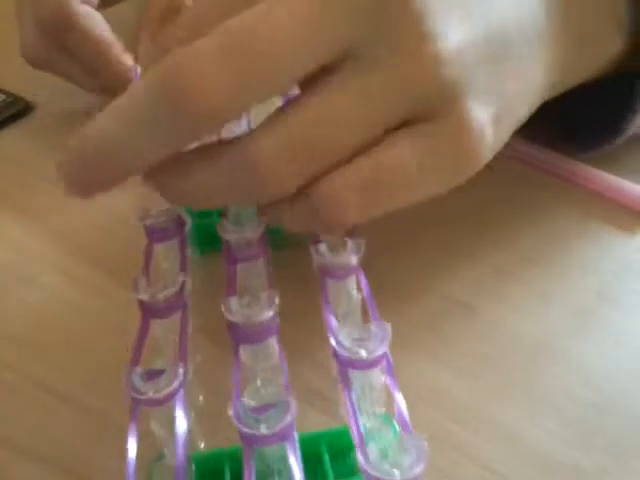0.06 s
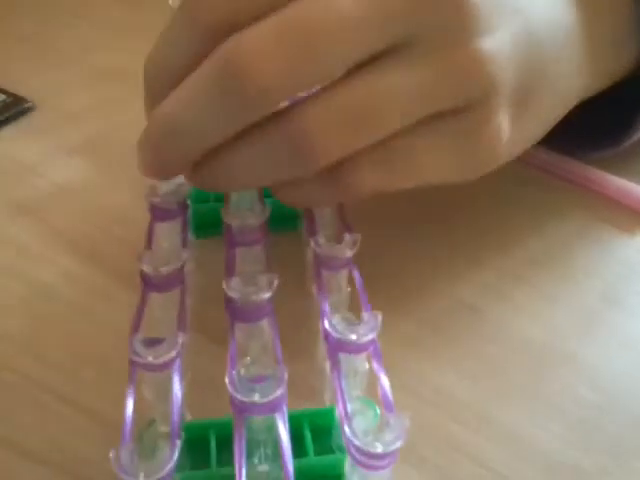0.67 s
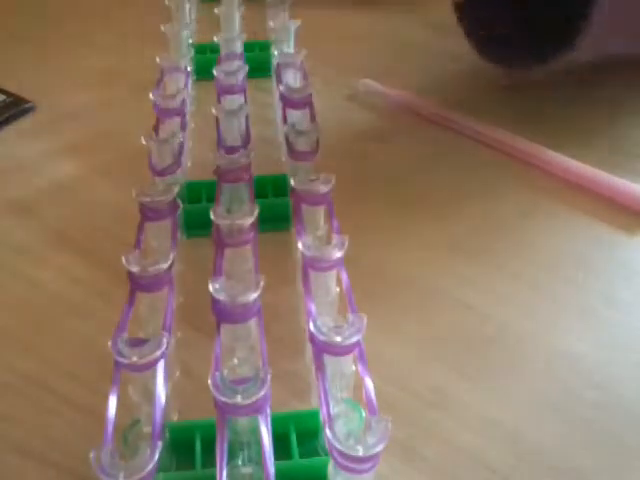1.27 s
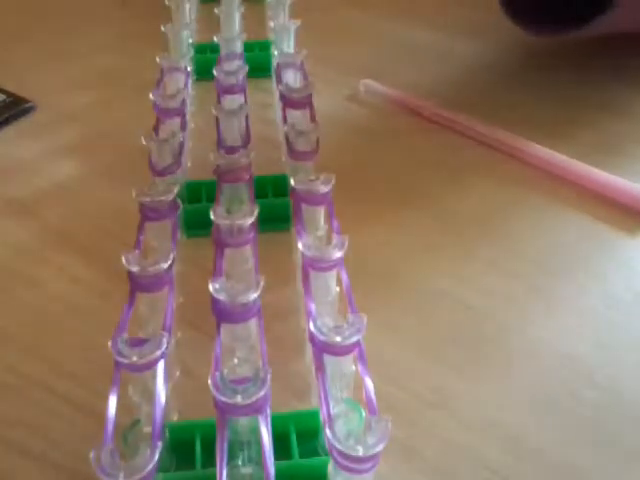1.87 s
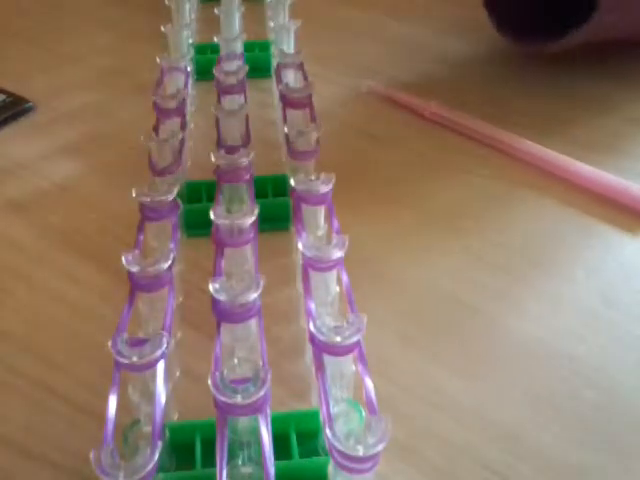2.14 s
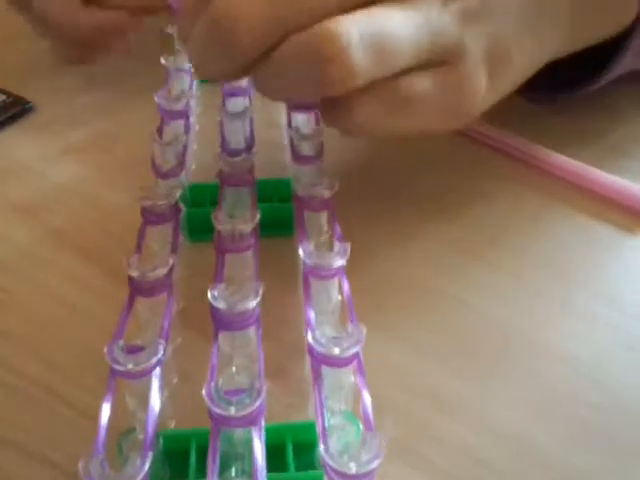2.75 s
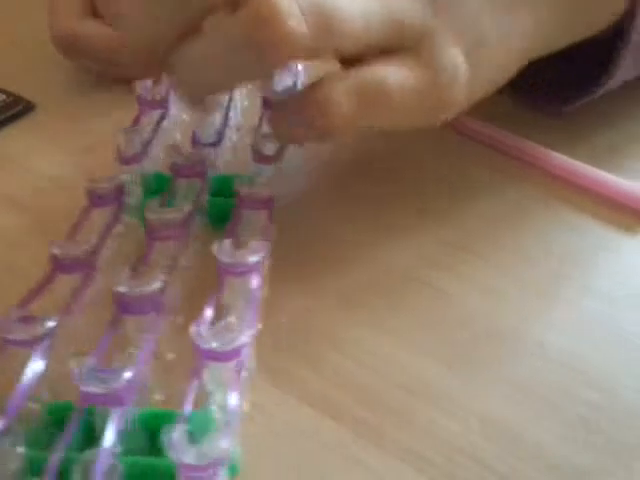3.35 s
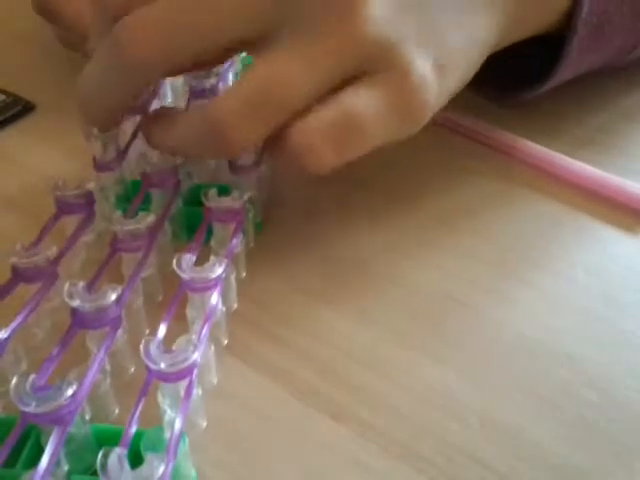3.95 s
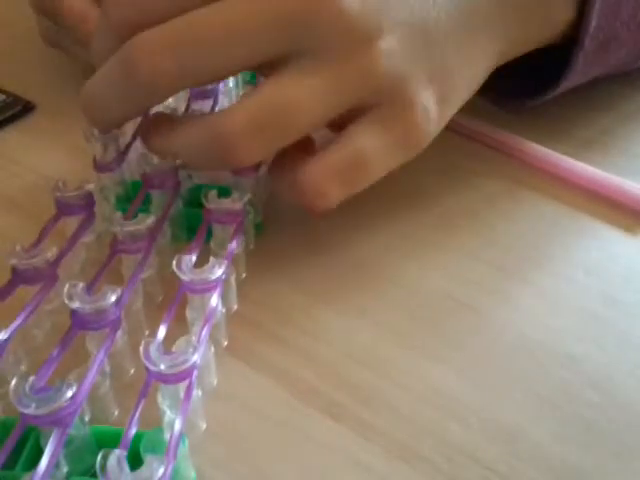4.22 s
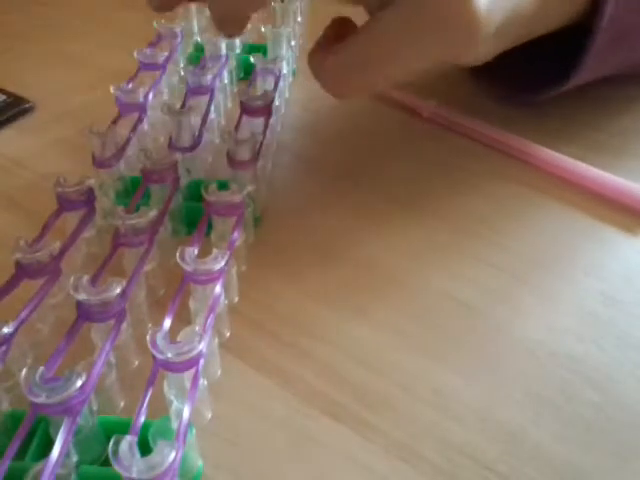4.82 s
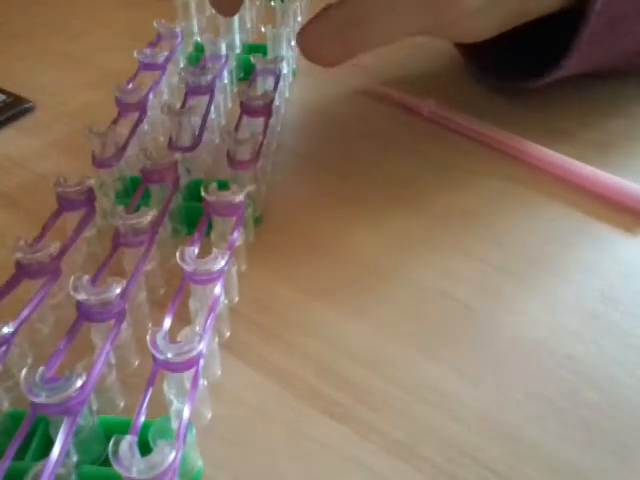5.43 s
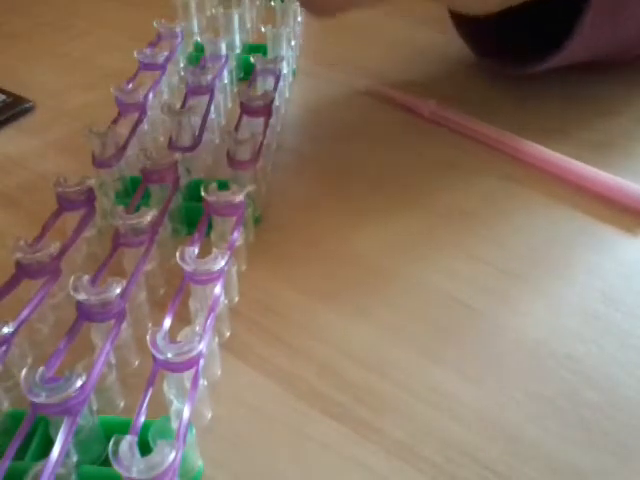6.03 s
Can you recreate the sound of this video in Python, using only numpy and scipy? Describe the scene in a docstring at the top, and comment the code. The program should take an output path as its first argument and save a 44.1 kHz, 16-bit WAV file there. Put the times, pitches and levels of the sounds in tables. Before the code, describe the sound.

Fingers work rubber bands over plastic loom pegs in a quiet room, making scattered clicks, light taps and soft scrapes.

```python
"""In a small, quiet room, rubber bands are hooked over the pegs of a plastic loom on a wooden table.
Impacts excite resonant modes: the pegs click, the frame clacks down and the table thumps, heard in
nearly opposite phase by two close microphones. Stick-slip friction makes the loom scrape as it is
pushed, the plastic rasp under the fingers and the table rumble under the arms. A thin hiss comes and
goes, and a short reverberation follows the loom's sounds over a faint background noise."""
import sys
import numpy as np
from scipy import signal
from scipy.fft import rfft, irfft
from scipy.io import wavfile
from scipy.ndimage import uniform_filter1d

SR = 44100
rng = np.random.default_rng(int(sys.argv[2]) if len(sys.argv) > 2 else 0)


def file_out(sig):
    """Save sig as 16-bit WAV at sys.argv[1]."""
    # one column per channel
    cols = np.atleast_2d(sig).T
    # limit, then scale
    lim = np.clip(cols, -1, 1)
    pcm = np.round(lim * 32767).astype(np.int16)
    wavfile.write(sys.argv[1], SR, pcm)


N = 273420
TIME = np.arange(N) / SR
HIT_SAMPLES = 2048
SIDES = np.array([[1], [-1]])   # left, right


def from_db(db):
    return 10 ** (np.asarray(db) / 20)


def unit_rms(x):
    return x / np.sqrt(np.mean(x ** 2) + 1e-20)


def at_hz(points, hz, column=1):
    """Interpolation of a table column on a log-frequency axis."""
    points = np.array(points)
    return np.interp(np.log(np.maximum(hz, 1)), np.log(points[:, 0]), points[:, column])


def add(out, start_s, sound):
    """Superposition: a sound sums into the mix from start_s on."""
    start = max(round(start_s * SR), 0)
    out[:, start:start + sound.shape[-1]] += sound[:, :N - start]


def band(x, low_hz, high_hz):
    """Band-pass filtering keeps one range of frequencies."""
    edges_hz = [low_hz, min(high_hz, .45 * SR)]
    return signal.sosfilt(signal.butter(2, edges_hz, "band", fs=SR, output="sos"), x)


def swell(start_s, length_s, attack_s, release_s):
    """An envelope: linear rise, hold, then exponential decay."""
    decay = np.exp(-np.maximum(TIME - start_s - length_s, 0) / release_s)
    return np.clip((TIME - start_s) / attack_s, 0, 1) * decay


def stereo(two, correlation):
    """Sum and difference of two independent signals set the left-right correlation."""
    return np.sqrt((1 + correlation) / 2) * two[0] + np.sqrt((1 - correlation) / 2) * two[1] * SIDES


def resonate(x, hz, width_hz):
    """A damped oscillator with unit gain at resonance."""
    r = np.exp(-np.pi * width_hz / SR)
    feedback = [1, -2 * r * np.cos(2 * np.pi * hz / SR), r * r]
    return signal.lfilter(np.array([1, 0, -1]) * (1 - r * r) / 2, feedback, x + 1e-18)


def body(force, modes):
    """Modal superposition: one force drives parallel resonances of alternating sign."""
    return sum((-1) ** k * from_db(db) * resonate(force, hz, width_hz)
               for k, (hz, width_hz, db) in enumerate(modes))


def friction(slips_per_s, spread_db, correlation, size=N):
    """Stick-slip friction: a dense random train of uneven impulses."""
    slips = (rng.random((2, size)) < slips_per_s / SR) * rng.choice([-1, 1], (2, size))
    strength = from_db(spread_db * np.minimum(rng.exponential(1, (2, size)), 4))
    return stereo(slips * strength, correlation)


# Spectrum of the background noise: frequency_hz, relative_density_db
AIR_SPECTRUM = [(15, -40), (25, -13), (60, -1), (118, -6.5), (243, -15.5), (318, -16), (515, -17.5),
                (749, -21.5), (811, -20.5), (1500, -24.5), (1760, -26.5), (5880, -28), (7280, -27),
                (13800, -30.5), (15000, -44.5)]

def still_air(level_db=-63, pan_db=1, dip_db=-10.5):
    """Broadband noise: room rumble and microphone hiss. The deepest rumble dips for a while."""
    hz = np.minimum(np.arange(N // 2 + 1) * SR / N, 13500)   # the hiss stays flat at the top
    white = stereo(rng.standard_normal((2, N)), 0.057)
    noise = unit_rms(irfft(rfft(white) * from_db(at_hz(AIR_SPECTRUM, hz)), N))
    deep = signal.sosfiltfilt(signal.butter(2, 90, fs=SR, output="sos"), noise)
    dip = from_db(dip_db * swell(start_s=2.65, length_s=1.0, attack_s=.12, release_s=0.203))
    return from_db(level_db + pan_db / 2 * SIDES) * (noise + (dip - 1) * deep)


# Low modes of the table top, damped by the hands: pitch_hz, width_hz, gain_db
RUMBLE_MODES = [(98.9, 29.5, -2), (153, 60, 0), (236.4, 130, -3), (403.4, 87, -11)]

def table_rumble(drag, resting_db=-78):
    """Forced vibration: skin and sleeves drag on the table, faintly even while the forearms rest."""
    rumble = body(friction(1500, spread_db=5.0, correlation=-0.77), RUMBLE_MODES)
    return (drag + from_db(resting_db)) * unit_rms(band(rumble, 85, 990))


def strike(modes, chatter_s, correlation, vary_db, detune, centre_hz=None, focus_db=0):
    """Impact excitation: a decaying volley of tiny slips rings each mode."""
    t, out = np.arange(HIT_SAMPLES) / SR, 0
    for hz, width_hz, db, pan_db in modes:
        force = stereo(rng.standard_normal((2, HIT_SAMPLES)), correlation) * np.exp(-t / chatter_s)
        hz = hz * np.exp(detune * rng.uniform(-1, 1))   # grip and band tension shift the modes
        if centre_hz:   # the spot that is touched favours the modes near one pitch
            db = db - focus_db * np.log2(hz / centre_hz) ** 2
        ring = resonate(force, hz, width_hz)
        for _ in range(2):   # steep skirts keep the valleys between modes dark
            ring = resonate(ring, hz, 0.83 * hz)
        ring = np.array([unit_rms(channel) for channel in ring])
        out = out + from_db(db + pan_db / 2 * SIDES + vary_db * rng.standard_normal((2, 1))) * ring
    return unit_rms(out) * np.sqrt(.01 * SR / HIT_SAMPLES)   # the energy of 10 ms at unit rms


# Modes of the struck parts: pitch_hz, base_width_hz, gain_db, pan_db (left minus right)
TABLE_MODES = [(137, 70, -18, 0), (245, 140, -2, 2), (400, 130, 2.5, -1), (496, 83, -6.5, 10),
               (657, 610, -7, -6)]
FRAME_MODES = [(910, 91, -4.5, -2), (1048, 184, -3.5, -7.5), (1386, 250, -4.5, -2.5), (1808, 193, -4, -2.5)]
PEG_MODES = [(2500, 940, 5, 4.5), (3690, 300, 3, -2.5), (4133, 330, -5, -21.5), (5420, 180, -1, -3.5)]
TIP_MODES = [(4560, 1500, -2.5, -8), (5690, 210, -4.5, -6.5), (6190, 450, 2, 0), (6914, 210, -0.5, 2),
             (7560, 270, -0.5, 5), (7920, 870, -11.5, 4.5)]
SNAP_MODES = [(11400, 1000, -5, 9.5), (12480, 410, -4.5, 0.5), (13500, 800, -2, 3.5)]
# Touches on the loom: start_s, level_db, weight_db, snap_db, tip_pitch_hz, chatter_s
# Weight (the table's thump) and snap are relative to the level.
TOUCHES = [ (0.0862, -45, -18.5, -8, 7100, .001), (0.194, -63, 5.5, -5, 7000, .005),
           (0.235, -44, -5.5, -12, 7090, 0.0024), (0.242, -51, 9, -16, 6000, .004),
           (0.2512, -34.5, -14, -6, 5860, 0.0003), (0.2542, -31.5, -7.5, -1, 6650, 0.0011),
           (0.262, -39.5, -12, -4.5, 5480, 0.0027), (0.2658, -26, -13, -22, 4940, 0.0021),
           (0.27, -26.5, -5, -19.5, 5520, .0017), (0.2767, -32, -3, -23.5, 6680, 0.0012),
           (0.2863, -36, -5, -15, 4777, 0.0022), (0.793, -66, 5.5, -3, 7240, 0.0052),
           (1.202, -50, -28, -7.5, 6060, 0.00034), (1.258, -58.5, -19, -15, 5800, .0005),
           (2.3077, -50.5, -25, -9.5, 5500, 0.00024), (2.818, -43, 4.5, -36, 5740, 0.0013),
           (2.8482, -48, -1.5, -28, 5600, 0.0036), (2.8931, -49.5, -5.5, -8, 6100, .0027),
           (2.955, -59.5, 4, -11, 5900, 0.005), (3.2219, -47.5, 2, -30, 5800, 0.0033),
           (3.4397, -54.5, 0, -24, 6150, 0.00096), (3.7315, -54, -2, -21, 6270, 0.0039),
           (3.744, -51, 6, -24, 5900, 0.0029), (3.9478, -34, -16.5, -15.5, 6300, 0.0043),
           (3.9546, -27, -17.5, -16, 7000, 0.001), (4.193, -46, -15, -13, 6200, 0.00059),
           (4.2314, -50.5, -8, -14, 6460, 0.005), (4.43, -58, 6, -22, 4900, 0.0098),
           (4.787, -57.5, 1.5, -7, 5830, .0018), (5.8053, -59.5, -14.5, -4.5, 5730, 0.0028),
           (5.9088, -67.5, -22.5, -12, 5660, .0008), ]

def loom_touches(blur, pan_db=1):
    """Modal ringing of table, frame, peg and tip, with a bright snap; blur scales the click bandwidths."""
    out = np.zeros((2, N))
    peg_modes, tip_modes, snap_modes = [
        [(hz, width_hz * blur, db, pan) for hz, width_hz, db, pan in modes]
        for modes in (PEG_MODES, TIP_MODES, SNAP_MODES)]
    for start_s, level_db, weight_db, snap_db, tip_hz, chatter_s in TOUCHES:
        table = strike(TABLE_MODES, chatter_s * 1.5, correlation=-0.92, vary_db=0.9, detune=0.038)
        frame = strike(FRAME_MODES, chatter_s * 1.315, correlation=0.54, vary_db=1.5, detune=0.087)
        # a touch near the tip favours the peg's upper modes, one near the base its lower ones
        peg = strike(peg_modes, chatter_s, correlation=0, vary_db=0.4, detune=0.025,
                     centre_hz=0.62 * tip_hz, focus_db=15.08 / blur)
        tip = strike(tip_modes, chatter_s, correlation=-0.032, vary_db=0.5, detune=0.013,
                     centre_hz=tip_hz, focus_db=60.0 / blur)
        snap = strike(snap_modes, chatter_s, correlation=0, vary_db=.8, detune=0.026)
        # a heavy touch drives the frame, a light one the tip
        knock = from_db(weight_db) * table + from_db(0.5 + 0.51 * weight_db) * frame
        click = peg + from_db(-3.5 - 0.34 * weight_db) * tip + from_db(snap_db) * snap
        add(out, start_s, from_db(level_db) * (knock + click))
    return out * from_db(pan_db / 2 * SIDES)


# Strokes on the plastic: start_s, length_s, level_db, pitch_hz, width_hz
RUBS = [(0.341, 0.013, -45, 1000, 120), (0.356, 0.023, -44.5, 950, 110), (2.702, 0.088, -54, 1320, 260),
        (3.165, 0.047, -55, 1030, 447), (3.437, 0.04, -47, 1150, 298), (3.569, 0.048, -60, 1100, 300),
        (4.426, 0.043, -52.5, 1100, 353)]

def frame_rubs():
    """Friction on fingers and wood drives one resonance of the frame, rising and falling with pressure."""
    out, t = np.zeros((2, N)), TIME[:4 * HIT_SAMPLES]
    for start_s, length_s, level_db, pitch_hz, width_hz in RUBS:
        pressure = np.sqrt(np.abs(np.sin(np.pi * np.clip(t / length_s, 0, 1))))
        slips = friction(2500, spread_db=6.0, correlation=0.4, size=len(t))
        rasp = unit_rms(band(resonate(slips, pitch_hz, width_hz), 570, 14000))
        add(out, start_s, from_db(level_db) * pressure * rasp)
    return out


# The hands shift the loom over the table: start_s, length_s, scrape_db, rumble_db
PUSHES = [ (0.38, 0.32, -65, -61.5), (0.728, 0.16, -65, -61), (2.26, .15, -67.5, -63.5),
          (2.677, 0.44, -61, -58.5), (3.082, 0.24, -56.5, -54.5), (3.371, .23, -57.5, -55),
          (3.754, 0.081, -59.5, -56), (4.11, 0.12, -61, -54.5), (4.383, 0.075, -60.5, -57.5),
          (4.75, 0.038, -60.5, -51), ]

def push_envelopes():
    """Friction noise follows effort: the amplitudes of the loom's scrape and the table's rumble."""
    scrape = rumble = 0
    for start_s, length_s, scrape_db, rumble_db in PUSHES:
        effort = swell(start_s, length_s, attack_s=.05, release_s=0.1)
        scrape = np.maximum(scrape, from_db(scrape_db) * effort)
        rumble = np.maximum(rumble, from_db(rumble_db) * effort)
    return scrape, rumble


# Modes of the sliding loom, damped by the hand: pitch_hz, width_hz, gain_db
SCRAPE_MODES = [(467, 210, -3.5), (980, 204, -2.5), (1366, 550, -7.5), (2370, 2660, -10.5),
                (3730, 1200, -7.5), (5460, 710, -7.5), (7000, 920, -8), (12400, 4600, -18.5)]

def loom_scrape(push, catching_db=1.8):
    """Stick-slip motion: the loom's feet catch and release on the wood, exciting its modes."""
    catching = uniform_filter1d(rng.standard_normal(N), size=500)
    catching = unit_rms(uniform_filter1d(catching, size=500))
    scrape = body(friction(2000, spread_db=1.0, correlation=-0.044), SCRAPE_MODES)
    return push * from_db(catching_db * catching) * unit_rms(band(scrape, 254.5, 12500))


# A thin hiss, likely a band drawn through the fingers: start_s, length_s, level_db, pitch_hz
BAND_DRAWS = [(1.258, 0.56, -72.5, 5620), (2.151, 0.25, -70.5, 5690), (2.63, 0.15, -66, 5700),
              (4.594, 0.4, -79.5, 7370)]

def band_draws(width_hz=480, skin_db=-6.5):
    """Sliding friction of rubber on skin: a narrow-band hiss over a broad rustle."""
    out, slips = 0, friction(3000, spread_db=3.5, correlation=0.066)
    rustle = from_db(skin_db) * unit_rms(band(slips, 2000, 15000))
    for start_s, length_s, level_db, pitch_hz in BAND_DRAWS:
        hiss = unit_rms(resonate(slips, pitch_hz, width_hz))
        pull = swell(start_s, length_s, attack_s=0.05, release_s=0.08)
        out = out + from_db(level_db) * pull * (hiss + rustle)
    return out


# Reverberation of the small room: frequency_hz, t60_s, gain_db
ROOM_DECAY = [(153, 0.36, -8.5), (400, 0.35, -9), (982, 0.3, -2), (2828, 0.31, -10.5), (6914, 0.3, -9.5),
              (14100, 0.23, -8.5)]

def reverberation(x, gap_s):
    """A diffuse field: reflections decay exponentially band by band, the lows last."""
    t, response = np.arange(SR) / SR, 0
    edges_hz = np.geomspace(100, 16000, 12)
    for low_hz, high_hz in zip(edges_hz, edges_hz[1:]):
        hz = np.sqrt(low_hz * high_hz)
        correlation = at_hz([(200, -.85), (600, 0.063), (1200, 0.25), (3000, -0.34)], hz)
        noise = stereo(rng.standard_normal((2, SR)), correlation)
        decay = from_db(-60 * t / at_hz(ROOM_DECAY, hz)) * (t > gap_s)
        tail = band(noise * decay / np.sqrt(np.sum(decay ** 2)), low_hz, high_hz)
        response = response + from_db(at_hz(ROOM_DECAY, hz, column=2)) * tail
    return signal.fftconvolve(x, response, axes=1)[:, :N]


def scene():
    """Superposition of the loom's direct sound, its reflections, the table's rumble and the background."""
    push, drag = push_envelopes()
    rubbing = loom_scrape(push) + frame_rubs() + band_draws()
    direct = loom_touches(blur=0.9) + rubbing
    # the walls gather every peg from every side, which blurs the resonances
    all_round = loom_touches(blur=2.5) + rubbing
    return direct + reverberation(all_round, gap_s=.002) + table_rumble(drag) + still_air()


def record(dry):
    """Band limiting: a steep low-pass filter removes the highest treble."""
    cutoff_hz = 14650
    return signal.sosfilt(signal.ellip(10, .1, 80, cutoff_hz, fs=SR, output="sos"), dry)


dry = scene()
out = record(dry)
file_out(out)
```